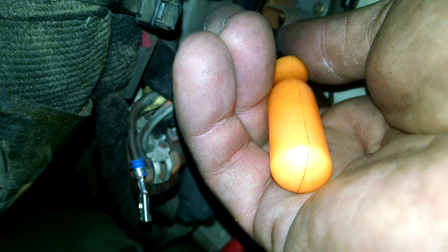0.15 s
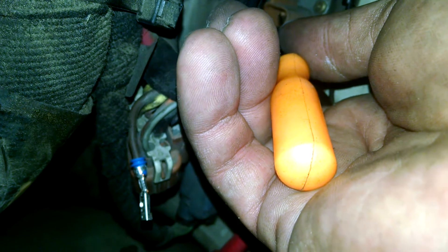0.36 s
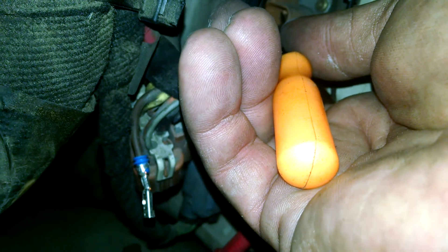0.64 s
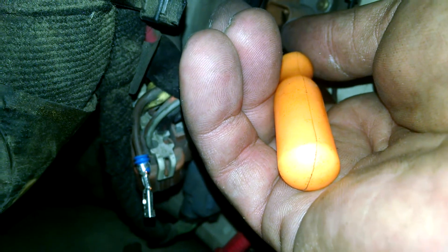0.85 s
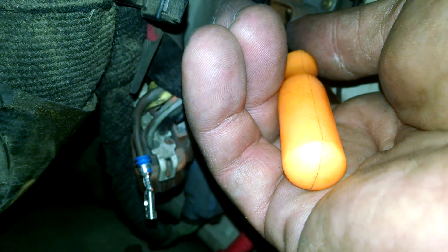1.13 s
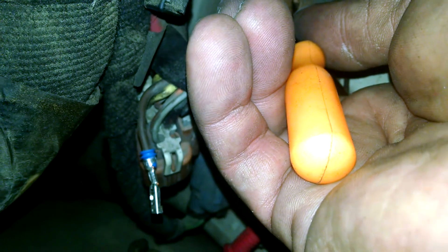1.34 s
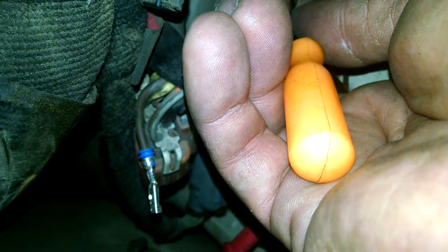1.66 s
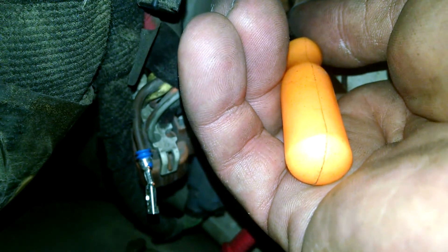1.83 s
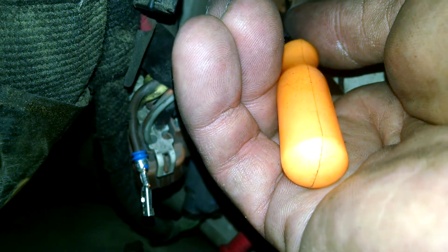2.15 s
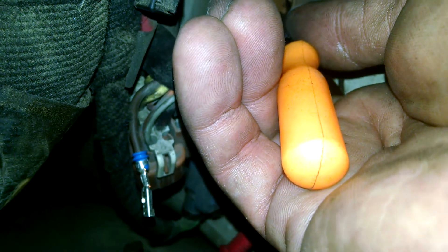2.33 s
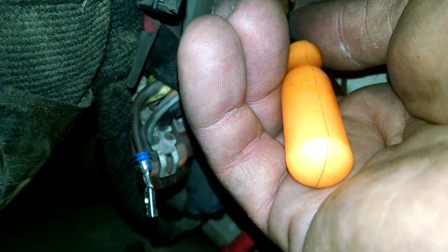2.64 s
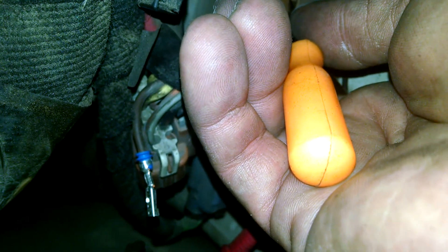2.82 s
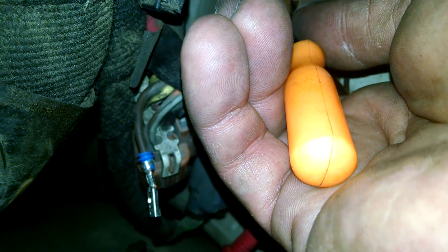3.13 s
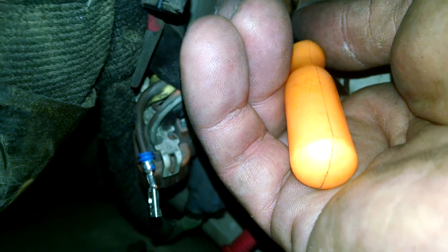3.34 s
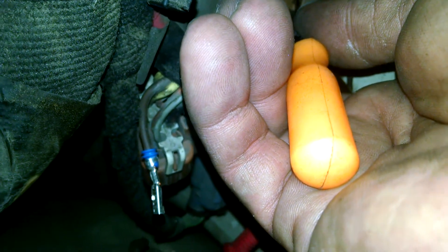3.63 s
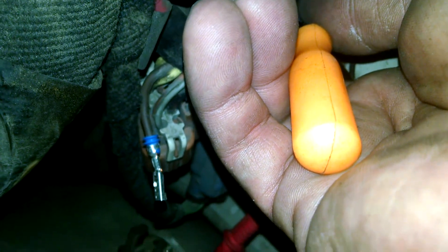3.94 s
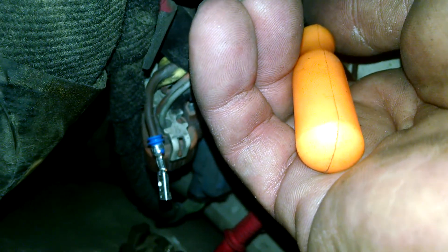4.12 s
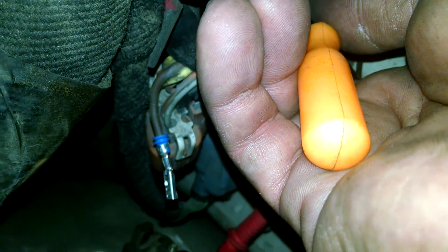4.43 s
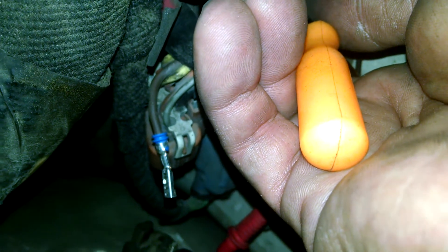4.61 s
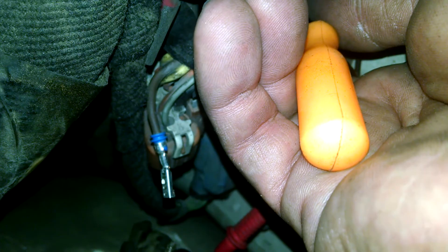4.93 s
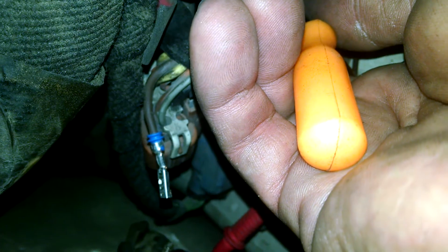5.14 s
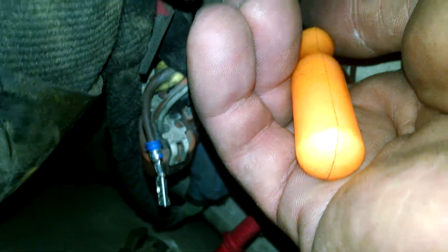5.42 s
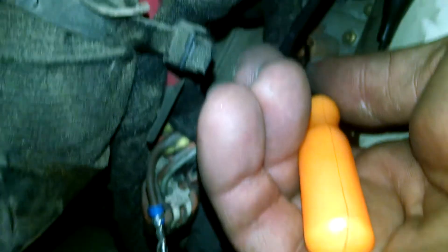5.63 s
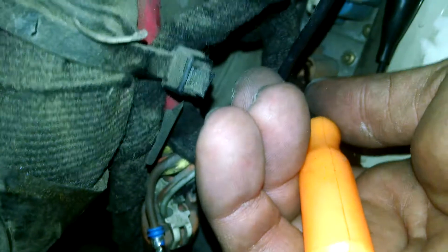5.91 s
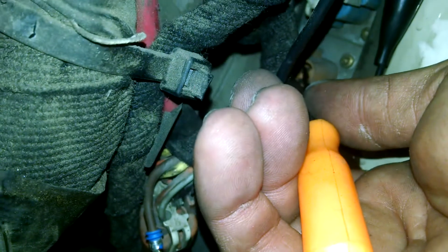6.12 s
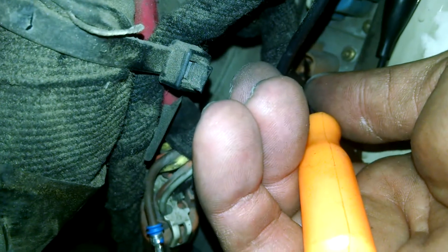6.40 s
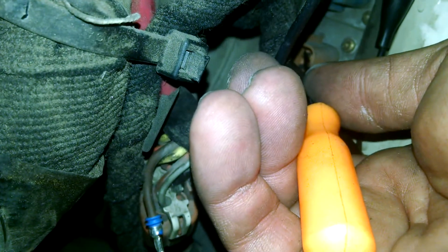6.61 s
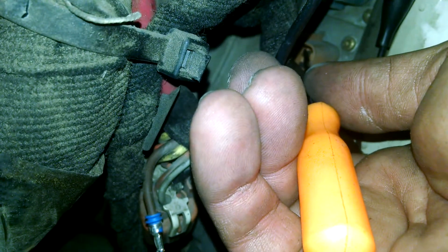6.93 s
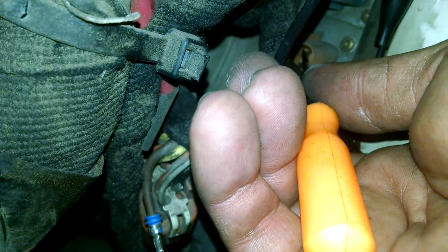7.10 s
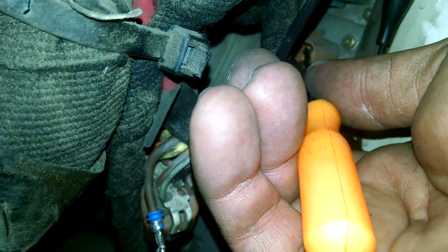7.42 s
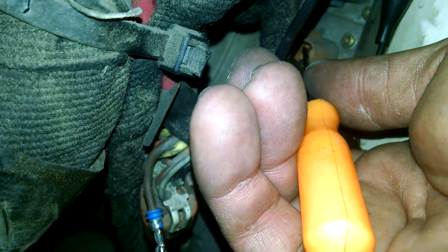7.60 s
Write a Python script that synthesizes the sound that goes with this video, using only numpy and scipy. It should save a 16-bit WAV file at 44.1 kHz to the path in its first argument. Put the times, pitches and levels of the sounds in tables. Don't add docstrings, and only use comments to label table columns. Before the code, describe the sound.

A handheld stereo recorder catches a tiny relay at close range: hard metallic strikes, looser plastic-sounding releases, almost no reverberation. An early pair and one quick double click leave a long gap filled with small finger ticks; later clicks crowd into an irregular chatter. The far engine hum swells, then sinks in pitch, with rumble, soft wind and hiss dipping briefly after each loud click.

```python
import sys
import numpy as np
from scipy import signal
from scipy.fft import rfft, irfft, next_fast_len
from scipy.io import wavfile
from scipy.ndimage import uniform_filter1d, minimum_filter1d, map_coordinates

SR = 44100
rng = np.random.default_rng(int(sys.argv[2]) if len(sys.argv) > 2 else 0)


def magnitude_from_level(level_db):
    exponent = np.asarray(level_db, float) / 20
    return 10 ** exponent


def master_out(mix):
    frames = np.transpose(np.atleast_2d(mix))
    ceiling = np.clip(frames, -1, 1)
    pcm = np.round(ceiling * 32767).astype(np.int16)
    wavfile.write(sys.argv[1], SR, pcm)


N = 342113

# (time [s], firing tone [Hz], level [dB])
ENGINE = [(0, 148, -33), (.58, 156, -32.5), (.99, 151.2, -36.5), (1.15, 134, -26.5), (1.49, 122.5, -21.5),
          (1.79, 121.7, -26), (2.1, 123.7, -25.5), (2.7, 125.8, -29), (3.35, 127.8, -24),
          (3.89, 126.2, -18), (4.45, 130.1, -19.5), (4.71, 130.2, -25), (5.06, 129.7, -23.5),
          (5.25, 117.3, -27.5), (5.5, 104.5, -29.5), (6.46, 102, -30), (6.85, 101, -38),
          (7.76, 99.7, -34.5)]
# (time [s], depth [dB], half length [s])
NULLS = [(1.202, -10, 0.02), (1.335, -12.5, 0.031), (1.42, -22, 0.021), (1.637, -7.5, 0.1),
         (1.951, -19, 0.04), (2.293, -6, 0.088), (2.788, -12, 0.045), (3.044, -13, 0.02),
         (3.182, -5, 0.081), (3.568, -7.5, 0.12), (4.028, -30, 0.042), (4.38, -20, 0.024),
         (5.047, -13, 0.0099), (5.202, -17, 0.022), (5.347, -22, 0.059), (5.57, -5, 0.056), (5.98, -2, 0.2),
         (6.097, -8, 0.034)]
# (time [s], level [dB])
UPPER_SWELLS = [(.45, -47), (1.22, -37), (2.4, -36.5), (2.96, -40), (3.55, -38), (3.9, -38), (4.25, -37),
                (5.23, -35.5), (5.48, -41.5), (5.75, -36), (6.05, -37), (6.35, -38.5), (6.65, -40)]
# (time [s], level [dB])
LOWER_SWELLS = [(1.06, -44), (1.4, -52), (1.9, -35), (2.2, -36), (2.42, -34), (2.75, -41), (3.05, -39),
                (3.55, -35), (4.2, -35.5), (5.23, -41), (6.3, -34.5), (7.67, -49)]
UPPER_HZ, LOWER_HZ = 206.6, 80
SWELL_S, BOOM_REST_DB = .12, -55
# (frequency [Hz], level [dB per Hz])
RUMBLE = [(20, -120), (50, -3.5), (120, 3), (250, -1.5), (450, -6), (800, -13.5), (1200, -14), (2000, -22),
          (3000, -29), (4500, -39.5), (7000, -57), (12000, -120)]
# (frequency [Hz], level [dB per Hz])
TYRES = [(500, -120), (650, -2), (800, 8), (950, 0.5), (1200, -22.5), (1700, -120)]
# (time [s], level [dB])
TRAFFIC = [(0, -48), (1.2, -44.5), (2.6, -46.5), (4, -41), (5, -46), (7.76, -49)]
# (frequency [Hz], level [dB per Hz])
HISS = [(1500, -120), (3500, -1), (6000, -5), (8000, -2), (10500, -2.5), (12300, 0), (13500, 4),
        (16500, -12)]
# (frequency [Hz], level [dB per Hz])
PUFFS = [(8, -43), (25, -1), (50, -2), (90, -3), (200, -32.5), (500, -120)]
# (time [s], rise [dB], half length [s])
GUSTS = [
    (2, 4.5, .3),
    (5, 6, .4),
    (5.854, 6.5, 0.11),
]
RUMBLE_DB, HISS_DB, WIND_DB = -32, -53.5, -41.5
WIND_FADE_DB_PER_S = -0.35
# (from [s], to [s], on or off)
WHINE_ODD = [
    (3.43, 3.58, 1),
    (3.75, 3.88, 1),
    (3.88, 3.9, 0),
    (3.925, 4.02, 0),
]
WHINE_HZ, WHINE_PERIOD, WHINE_ON, WHINE_START = 14002, .3198, .175, .0585
# (frequency [Hz], level [dB per Hz])
PASSING = [(600, -120), (800, -7), (970, 2), (1150, -10), (1500, -120)]
PASS_S, PASS_HALF_S, PASS_DB = 0.12, 0.38, -43
# (time [s], half length [s], frequency [Hz], level [dB])
DRONES = [(0.3, .35, 386, -45), (0.5, .12, 138, -40), (1.3, .25, 380, -47), (2.85, .6, 316, -47),
          (2.9, .6, 385, -47), (3.7, .2, 385, -45), (3.85, .3, 255, -46), (3.9, .35, 316, -44),
          (3.95, .25, 175, -42), (4.1, .2, 450, -46), (4.3, .12, 408, -43), (4.35, .15, 320, -44),
          (6.85, .2, 242, -44), (6.9, .3, 305, -44), (7.05, .25, 450, -44), (7.5, .25, 318, -45),
          (7.65, .2, 457, -44)]
IDLER_HZ, IDLER_S, IDLER_HALF_S, IDLER_DB = 139.4, 6.33, 0.6, -35.5

# (time [s], peak [dB], low part relative
# [dB])
TICKS = [(0.3746, -37, -23), (1.329, -33, -11), (1.8295, -49.5, -9), (1.951, -33, -7), (1.96, -31, -13),
         (1.9741, -38, -14), (2.148, -38, -17), (2.1982, -32, -5), (2.2947, -44, -17), (2.318, -39.5, -18),
         (3.2547, -48.5, -15), (3.3295, -38, -19), (3.401, -34, -14), (3.406, -30, -9), (3.414, -35, -10),
         (3.488, -27.5, -11), (3.493, -39, -12), (3.497, -37, -12), (4.4369, -44, 0), (4.8966, -28.5, -5),
         (5.5852, -45, 0), (5.9223, -42.5, 3)]
# (time [s], half length [s], level [dB])
RUBS = [
    (1.216, 0.32, -57),
    (2.345, 0.17, -56.5),
    (3.427, 0.042, -45),
    (5.621, 0.057, -47),
]
# (frequency [Hz], level [dB per Hz])
CLOTH = [(3000, -120), (5000, -11), (9000, -12.5), (13000, 2), (16500, -6.5)]

# (frequency [Hz], width [Hz], level [dB])
CASE = [(1840, 2400, -6.5), (2930, 700, 3), (3500, 630, 2), (5080, 440, -1)]
# (frequency [Hz], width [Hz], level [dB])
ARMATURE = [(5500, 1400, -9.5), (6800, 290, -5.5), (7800, 380, 4), (8310, 1500, -5)]
# (frequency [Hz], width [Hz], level [dB])
SPRING = [(9800, 430, -1), (10830, 1450, -1.5), (11640, 650, -0.5), (12200, 310, -1), (14000, 960, 0.5),
          (14300, 500, 0.5), (15300, 350, 1)]
# (peak time [s], armature [dB], rise [ms], case relative [dB], spring relative [dB])
PULLS = [(0.6237, -12, 1.9, -16, 8), (0.64, -17.5, 0.9, -13.5, 8), (1.5646, -13, 1.7, -18, 8),
         (4.4769, -10.5, 0.93, -5, 9.5), (4.9177, -12, 2, -14, 6.5), (5.313, -10.5, 1.6, -38.5, 4),
         (5.8564, -11.5, 2, -32, 4), (6.0738, -15, 1.7, -27, 6), (6.498, -11, 0.49, -17, 7),
         (6.8284, -13, 0.5, -16, 8.5), (7.1494, -11.5, 0.37, -24, 6), (7.6359, -11, 0.73, -16, 3.5)]
# (frequency [Hz], level [dB], swell [ms])
CORE = [(2600, -51.5, 0.98), (4450, -21.5, 0.91), (6350, -7.5, 0.63), (7740, -9.5, 0.72), (8330, 4, 0.37),
        (10200, -3, 0.95), (11800, -1.5, 0.48), (14880, -12.5, 0.48), (15500, -8, 0.9), (3420, -27.5, 1.2),
        (5620, -19.5, 0.9), (14150, -8, 0.7)]
# (peak time [s], armature [dB], rise [ms], case relative [dB], spring relative [dB])
SNAPS = [(0.7341, -22, 3.1, -13, 8.5), (1.5682, -20, 1.8, -5.5, 10), (5.5498, -22, 1.3, -8, 6.5),
         (5.7176, -19.5, 1.45, -15.5, 5), (5.721, -21, 2.0, -21, 3.5), (5.8164, -24, 3.4, -12, 6),
         (6.6144, -26.5, 1.2, -21, 8), (7.229, -35, 4.7, -4, 6.5), (7.4054, -22.5, 1.3, -29, 8.5),
         (7.4087, -40, 0.72, -7, 2)]
# (peak time [s], armature [dB], fall [ms], case relative [dB], spring relative [dB])
RATTLES = [(0.632, -28, 3.9, -6, 8), (0.654, -45.5, 5, -8, 6), (1.5738, -39, 2.2, 2, 5),
           (4.597, -21, 3, -9.5, 7), (5.0657, -28, 2.1, -3, 5.5), (5.069, -41, 4.6, 5.5, -4),
           (5.5529, -37, 2.3, 6, 10), (5.8906, -29, 3, -8.5, 2), (6.066, -28.5, 5, -8, 4.5),
           (6.266, -29, 3.3, 1.5, 7), (6.615, -26.5, 2.2, -17, 5.5), (7.0026, -27.5, 3.4, -5, 1),
           (7.134, -33.5, 2.9, -7, 16), (7.5221, -31.5, 2.52, -5, 7), (7.5246, -29, 2.5, -9, 4)]
# (peak time [s], armature [dB])
LET_GO = [(0.6222, -27), (1.5632, -24), (5.0657, -30), (5.812, -20), (5.8877, -24.5), (6.0644, -21.5),
          (6.264, -27), (6.6118, -26.5), (7.0005, -23), (7.1322, -31), (7.225, -29), (7.4029, -22),
          (7.5205, -25)]
# (peak time [s], armature [dB])
STIRS = [(5.8862, -42), (6.0632, -41), (6.2635, -41.5), (6.4945, -38), (7.131, -46), (7.634, -42.5)]
# (time [s], frequency [Hz], level [dB], t60 [s])
KNOCKS = [(0.7312, 3150, -35, 0.018), (0.7322, 5100, -31, .012), (1.5665, 3585, -32, 0.015),
          (1.5683, 4510, -26, .014), (4.5968, 5560, -30, .01), (4.5969, 4600, -27, .009),
          (4.6015, 3800, -32, .02), (5.064, 4320, -37, .02), (5.067, 3380, -33, .025),
          (5.068, 2900, -35, .015), (5.551, 4330, -27, 0.014), (5.553, 3720, -27.5, 0.016),
          (5.5532, 3433, -28, 0.017), (5.7195, 5301, -34, .012), (5.7207, 4680, -32, .012),
          (5.8124, 3370, -35, .015), (5.8147, 2930, -31, .012), (5.815, 4700, -31, .012),
          (5.8897, 3800, -45, 0.018), (6.068, 3420, -34, .015), (6.2672, 3640, -21, 0.013),
          (6.268, 3400, -27, .02), (6.2683, 3100, -27, .015), (6.6143, 2801, -34, .012),
          (6.6144, 5500, -40, 0.013), (7.003, 3070, -36.5, 0.017), (7.004, 3100, -36, .03),
          (7.0036, 3770, -38, .02), (7.135, 3382, -40, .02), (7.136, 3950, -39, 0.017),
          (7.137, 4470, -35, .02), (7.2246, 3370, -43, .02), (7.227, 4400, -40, 0.022),
          (7.4048, 4470, -37, .012), (7.4052, 5300, -37, .01), (7.5206, 4400, -37, .02),
          (7.5207, 4900, -42, .02), (7.522, 3600, -37, .025), (7.6355, 4400, -31, .01),
          (7.6356, 6400, -20, .006)]
PULL_FALL_MS, SNAP_FALL_MS, RATTLE_RISE_MS = 1.63, 0.83, 1.55
TICK_RISE_MS, TICK_FALL_MS, TICK_CASE_DB, TICK_SPRING_DB = 0.32, 0.47, -9, 5
LONGEST_T60 = .024
# (frequency [Hz], t60 [s])
FOOTWELL = [(2000, 0.13), (8000, 0.048), (16000, 0.069)]

# (time [s], level it drops to [dB])
DUCKS = [(0.622, -8.5), (.734, -8.5), (1.565, -8.5), (4.477, -8), (4.917, -7.5), (5.314, -8.5), (5.551, -6),
         (5.855, -9), (6.075, -10), (6.499, -10), (6.829, -9.5), (7.15, -10), (7.406, -8), (7.635, -10.5)]
# (delay [ms], level [dB])
HAND = [
    (0.308, -26.5),
    (0.518, -18),
]
# (frequency [Hz], left minus right [dB])
RELAY_TILT = [(2000, 2), (5000, 5), (6300, 2.5), (8600, 8), (9600, -7.5), (11500, 1), (13000, -1.5)]
# (frequency [Hz], phase taken back [radians])
RELAY_TURN = [(2500, 0.11), (3600, -0.17), (5000, 0.34), (6350, -0.54), (7650, -1.54), (8500, -0.31),
              (10400, 0.39), (12000, 0.19), (14200, -0.0022)]
# (frequency [Hz], left minus right [dB])
PORT_TILT = [(30, -7), (130, -4.5), (400, -1.5), (1000, -0.5), (4000, -5.5), (12000, -4)]
# (frequency [Hz], phase taken back [radians])
PORT_TURN = [(30, 0.21), (130, 1.04), (300, 1.14), (600, 0.67), (1000, 0.4), (1500, 0.048), (3800, 0.41),
             (4900, 0.56), (6500, 0.39), (7900, -0.6), (10300, -0.053)]
PORT_LAG = 17.3 / 44100
# (frequency [Hz], level [dB])
MICROPHONE = [(15400, 0), (15800, -9), (16300, -12), (16900, -38), (17300, -60)]
# (frequency [Hz], level under the other of mid and side [dB])
THRIFT = [(2000, -20), (2550, -3.5), (4200, -6), (5050, -1), (7000, -7), (8050, -2), (9500, -8.5),
          (15200, -6)]


def unit(x):
    return x / np.sqrt(np.mean(x ** 2) + 1e-20)


def along(points, hz):
    f, v = np.transpose(points)
    return np.interp(np.log(hz + 1), np.log(f + 1), v)


def curves(rows):
    s, *cols = np.transpose(rows)
    return [np.interp(np.arange(N) / SR, s, c) for c in cols]


def wobble(rate):
    knots = rng.standard_normal(int(N * rate / SR) + 4)
    return map_coordinates(knots, [np.arange(N) * rate / SR])


def bump(s, half):
    return np.exp(-((np.arange(N) / SR - s) / half) ** 2)


def filtered(x, response):
    m = next_fast_len(N + 8192)
    return irfft(rfft(x, m) * response(np.fft.rfftfreq(m, 1 / SR)), m)[..., :N]


def noise(spectrum):
    return unit(filtered(rng.standard_normal(N), lambda hz: magnitude_from_level(along(spectrum, hz))))


def ringing(x, modes):
    def sound(f):
        total = 0
        for k, (c, w, db) in enumerate(modes):
            total = total + (-1) ** k * magnitude_from_level(db) * 1j * f * w / (c * c - f * f + 1j * f * w)
        return total

    return filtered(x, sound) / np.sqrt(np.mean(abs(sound(np.arange(0, SR / 2, 10))) ** 2))


def hum(hz, db, waver):
    phase = 2 * np.pi * np.cumsum(hz * (1 + waver * wobble(12))) / SR
    return np.sqrt(2) * magnitude_from_level(db) * np.sin(phase)


def boom(swells, hz, waver):
    level = magnitude_from_level(BOOM_REST_DB + 2.8 * wobble(3.4))
    level = level + sum(magnitude_from_level(db) * bump(s, SWELL_S) for s, db in swells)
    return level * hum(hz, 0, waver)


def engine():
    firing_hz, firing_db = curves(ENGINE)
    firing_db = firing_db + sum(db * bump(s, half) for s, db, half in NULLS)
    firing = hum(firing_hz, firing_db, waver=0.01027)
    return firing + boom(UPPER_SWELLS, UPPER_HZ, 0.0086) + boom(LOWER_SWELLS, LOWER_HZ, 0.039)


def rumble():
    tyre_db, = curves(TRAFFIC)
    cabin = magnitude_from_level(RUMBLE_DB + 0.76 * wobble(6)) * noise(RUMBLE)
    return cabin + magnitude_from_level(tyre_db + 0.51 * wobble(4.3)) * noise(TYRES)


def wind():
    wind_db = WIND_DB + WIND_FADE_DB_PER_S * np.arange(N) / SR
    wind_db = wind_db + sum(db * bump(s, half) for s, db, half in GUSTS)
    return magnitude_from_level(wind_db + 3.1 * wobble(9.3)) * noise(PUFFS)


def whine(db=-53):
    t = np.arange(N) / SR
    on = 1. * ((t - WHINE_START) % WHINE_PERIOD < WHINE_ON)
    for start, end, state in WHINE_ODD:
        on[(t > start) & (t < end)] = state
    edges = [(t - WHINE_START - lag) % WHINE_PERIOD for lag in (-.003, WHINE_ON)]
    tick = sum(magnitude_from_level(db + 10.5 - 60 * since / .008) for since in edges) * noise(CLOTH)
    return magnitude_from_level(db) * uniform_filter1d(on, size=90) * np.sin(2 * np.pi * WHINE_HZ * t) + tick


def passing():
    return magnitude_from_level(PASS_DB) * bump(PASS_S, PASS_HALF_S) * noise(PASSING)


def drones():
    return sum(bump(s, half) * hum(hz, db + 2.9 * wobble(5.5), waver=0.01994) for s, half, hz, db in DRONES)


def handling():
    t, bright, dull = np.arange(N) / SR, np.zeros(N), np.zeros(N)
    for s, db, low_db in TICKS:
        dying = magnitude_from_level(db - 6.5 - 60 * t[:900] / 0.011)
        bright[round(s * SR):][:900] += dying
        dull[round(s * SR):][:900] += dying * magnitude_from_level(low_db)
    stroke = sum(magnitude_from_level(db) * np.exp(-((t - s) / half) ** 2) for s, half, db in RUBS)
    stroke = stroke * magnitude_from_level(3.3 * wobble(160))
    body = unit(ringing(rng.standard_normal(N), ARMATURE[:2] + CASE))
    return (bright + stroke) * noise(CLOTH) + dull * body


def chatter(contacts, spiky_db):
    force, ms = np.zeros((3, N + 2000)), np.arange(-300, 1000) / SR * 1000
    for s, db, rise, fall, case_db, spring_db in contacts:
        shape_db = np.where(ms < 0, -8 * (ms / rise) ** 4, -9 * ms / fall)
        blows = rng.standard_normal((3, len(ms))) * magnitude_from_level(spiky_db * rng.standard_normal(len(ms)))
        blows /= np.sqrt(np.average(blows ** 2, axis=1, weights=magnitude_from_level(2 * shape_db)))[:, None]
        part_db = np.array([[case_db], [0], [spring_db]])
        force[:, round(s * SR) - 300:][:, :len(ms)] += blows * magnitude_from_level(shape_db + db + part_db)
    return sum(ringing(f[:N], modes) for f, modes in zip(force, (CASE, ARMATURE, SPRING)))


def strikes(lead_ms=.75):
    out, ms = np.zeros(N + 400), np.arange(400) / SR * 1000
    for s, db, *_ in PULLS:
        start = round((s - lead_ms / 1000) * SR)
        for hz, mode_db, swell in CORE:
            detune, scatter_db = rng.normal(0, [.007, 1.1])
            envelope = ms / swell * np.exp(1 - ms / swell)
            ring = envelope * np.sin(2 * np.pi * hz * (1 + detune) * ms / 1000)
            out[start:][:400] += magnitude_from_level(db + mode_db + scatter_db) * ring
    return out[:N]


def knocks(split=0.023, partner_db=-8):
    out, t = np.zeros(N), np.arange(2000) / SR
    onset = 1 - np.exp(-t / 0.00068)
    for s, hz, db, t60 in KNOCKS:
        partner = np.sin(2 * np.pi * (hz * (1 + split) * t + rng.random()))
        ring = np.sin(2 * np.pi * hz * t) + magnitude_from_level(partner_db) * partner
        out[round(s * SR):][:2000] += magnitude_from_level(db + 4.0 - 60 * t / min(t60, LONGEST_T60)) * onset * ring
    return out


def relay():
    touches = [(s - .0019, db - 19.0, .5, 1.1, -12, 9) for s, db, *_ in PULLS]
    pulls = [(s, db, rise, PULL_FALL_MS, *colour) for s, db, rise, *colour in PULLS]
    snaps = [(s, db, rise, SNAP_FALL_MS, *colour) for s, db, rise, *colour in SNAPS]
    rattles = [(s, db, RATTLE_RISE_MS, fall, *colour) for s, db, fall, *colour in RATTLES]
    tick_shape = (TICK_RISE_MS, TICK_FALL_MS, TICK_CASE_DB, TICK_SPRING_DB)
    ticks = [(s, db, *tick_shape) for s, db in LET_GO + STIRS]
    pull_in = strikes() + magnitude_from_level(-8.5) * chatter(pulls, spiky_db=1.0)
    return pull_in + knocks() + chatter(snaps + rattles + touches + ticks, spiky_db=4.5)


def footwell(x, size=4096):
    blocks = np.pad(x, (0, -N % size)).reshape(-1, size)
    hz, t, z = signal.stft(rng.standard_normal(blocks.shape), SR, nperseg=128)
    dying = magnitude_from_level(-60 * t / along(FOOTWELL, hz)[:, None])
    tails = signal.istft(z * dying, SR, nperseg=128)[1][:, :size]
    tails = tails / np.linalg.norm(tails, axis=1)[:, None]
    wet = signal.fftconvolve(blocks, tails, axes=1)
    spill = np.pad(wet[:-1, size:], ((1, 0), (0, 1)))
    return (wet[:, :size] + spill).ravel()[:N]


def gain_db(recover=11, hold=0.14):
    t = np.arange(N) / SR
    gain = np.zeros(N)
    for s, db in DUCKS:
        gain = np.minimum(gain, np.where(t > s, db + recover * np.maximum(t - s - hold, 0), 0))
    return uniform_filter1d(gain, size=200)


def idler():
    return bump(IDLER_S, IDLER_HALF_S) * hum(IDLER_HZ, IDLER_DB + 2.5 * wobble(4.93), waver=0.013)


def ports(x, tilt, turn):
    lead = lambda hz: np.pi - 2 * np.pi * hz * PORT_LAG - along(turn, hz)
    left = filtered(x, lambda hz: magnitude_from_level(along(tilt, hz) / 2) * np.exp(1j * lead(hz)))
    right = filtered(x, lambda hz: magnitude_from_level(-along(tilt, hz) / 2))
    return np.array([left, right])


def cupped(pair):
    echo = lambda hz: np.array([1 + magnitude_from_level(db) * np.exp(-2j * np.pi * hz * ms / 1000) for ms, db in HAND])
    return filtered(pair, echo)


def thrifty(x, loud_db=13):
    hz, t, z = signal.stft(np.array([x[0] + x[1], x[0] - x[1]]) / 2, SR, nperseg=512)
    low_hz = hz[:256, None]
    power = np.abs(z[:, :256].reshape(2, 64, 4, -1)) ** 2
    fickle = magnitude_from_level(6 * 1.4 * uniform_filter1d(rng.standard_normal((2, 64, len(t))), size=6))
    power = uniform_filter1d(power.sum(axis=2), size=5, axis=2) * fickle
    power = np.repeat(power, 4, axis=1)

    treble = (np.abs(z[:, 30:]) ** 2).sum(axis=(0, 1))
    edge = np.diff(x[0] + x[1], prepend=0) ** 2
    crest = -minimum_filter1d(-edge, size=400) / uniform_filter1d(edge, size=2048)
    calm = np.interp(t * SR, np.arange(N), crest) < 29
    steady = (treble < magnitude_from_level(2 * loud_db) * np.median(treble)) & calm

    ducked_db = -1.2 - .3 * np.interp(t * SR, np.arange(N), gain_db())
    weak = power < magnitude_from_level(2 * (along(THRIFT, low_hz) + ducked_db)) * power[::-1]
    mid_top_hz = np.where(fickle[0, -1] > magnitude_from_level(4), 15650, 15050)
    top_hz = np.array([mid_top_hz, np.full(len(t), 15650)])
    dropped = weak | (low_hz > top_hz[:, None])
    z[:, :256] *= ~(dropped & steady)
    mid, side = signal.istft(z, SR, nperseg=512)[1][:, :N]
    return np.array([mid + side, mid - side])


def scene():
    gain, clicks = magnitude_from_level(gain_db()), relay()
    far = engine() + rumble() + magnitude_from_level(HISS_DB) * noise(HISS) + whine() + wind()
    far += passing() + drones() + idler()
    apart = [magnitude_from_level(-7) * rumble() + magnitude_from_level(HISS_DB - 6) * noise(HISS) + magnitude_from_level(-9) * wind() for port in range(2)]
    echoes = magnitude_from_level(-23.0) * np.array([footwell(clicks) for port in range(2)])
    close = clicks + magnitude_from_level(-17.0) * footwell(clicks) + handling()
    near = cupped(ports(close, RELAY_TILT, RELAY_TURN)) + echoes
    return near + ports(gain * far, PORT_TILT, PORT_TURN) + gain * np.array(apart)


def band_limit(x):
    return signal.sosfilt(signal.butter(12, 16800, fs=SR, output="sos"), x)


def record(dry):
    heard = filtered(dry, lambda hz: magnitude_from_level(along(MICROPHONE, hz)))
    held = heard / (1 + np.abs(heard / 1.05) ** 6) ** (1 / 6)
    finished = thrifty(held)
    return band_limit(finished)


dry = scene()
out = record(dry)
master_out(out)
```